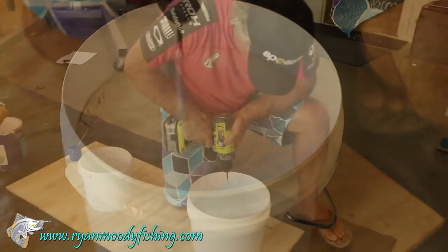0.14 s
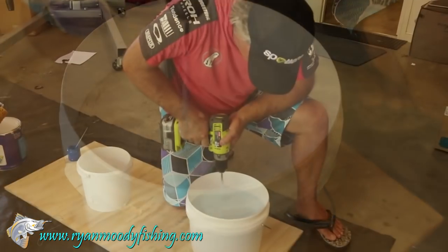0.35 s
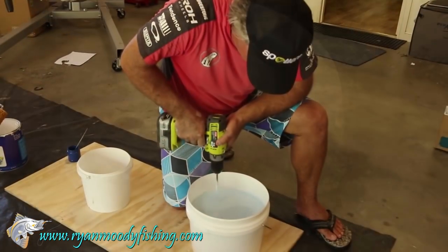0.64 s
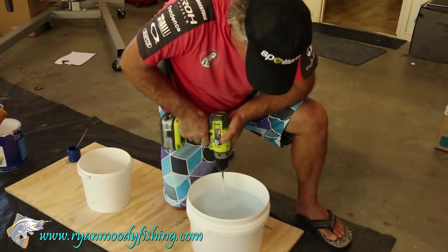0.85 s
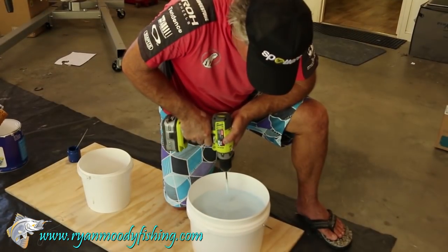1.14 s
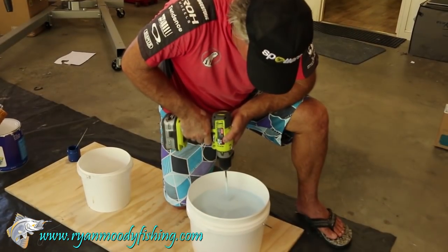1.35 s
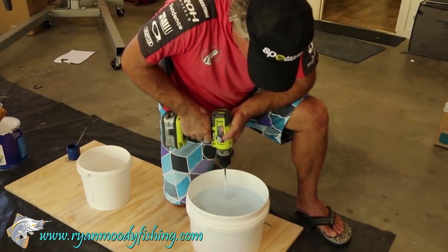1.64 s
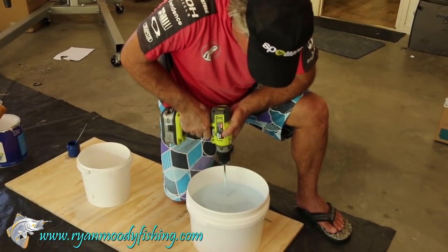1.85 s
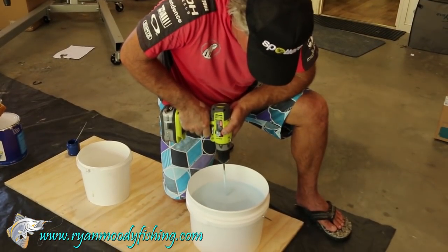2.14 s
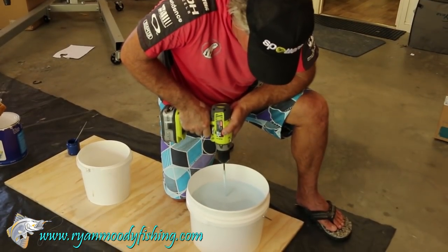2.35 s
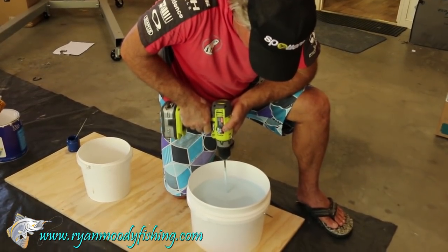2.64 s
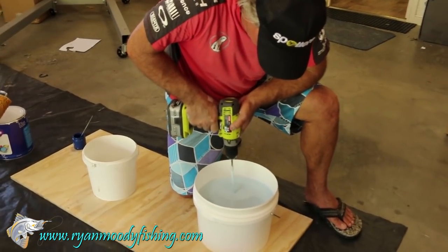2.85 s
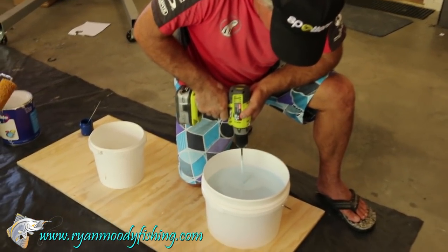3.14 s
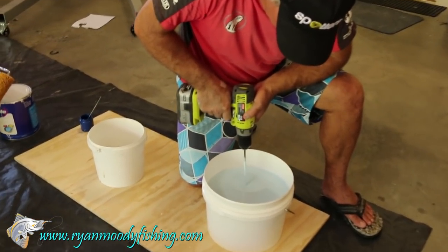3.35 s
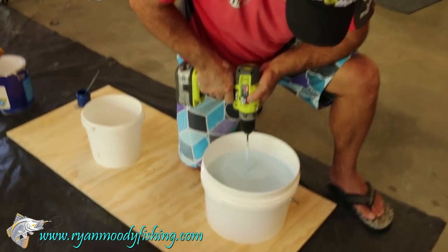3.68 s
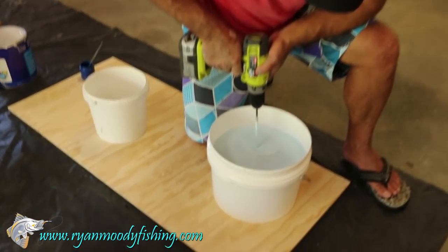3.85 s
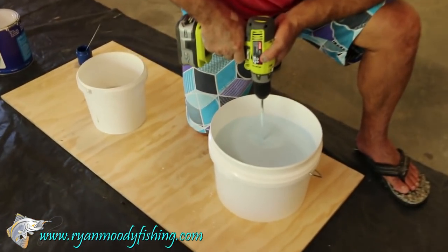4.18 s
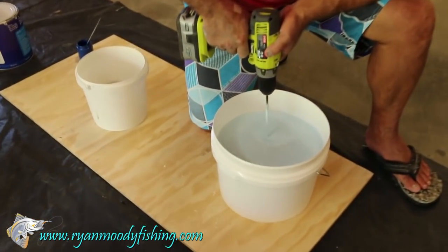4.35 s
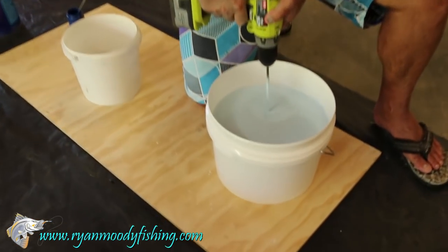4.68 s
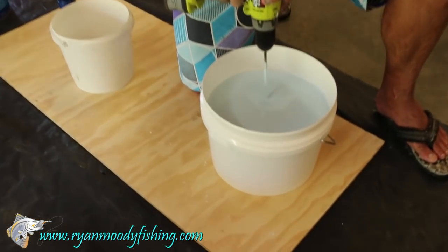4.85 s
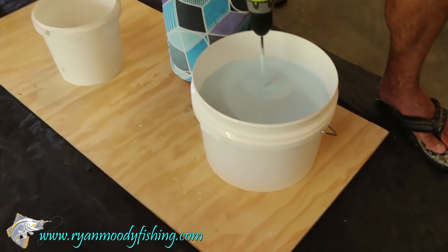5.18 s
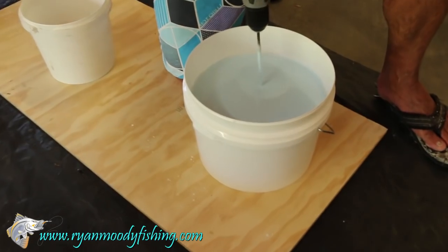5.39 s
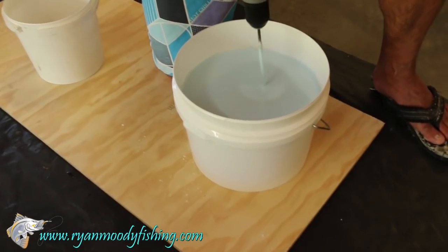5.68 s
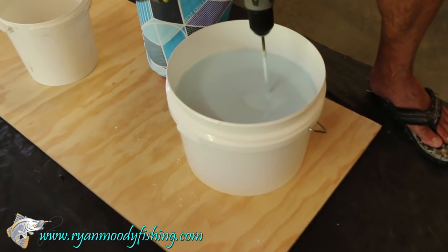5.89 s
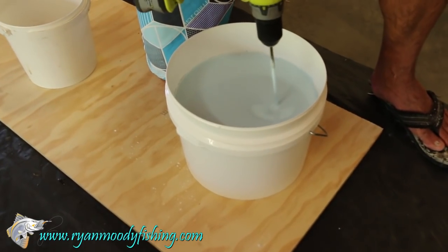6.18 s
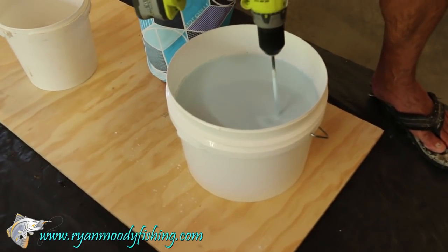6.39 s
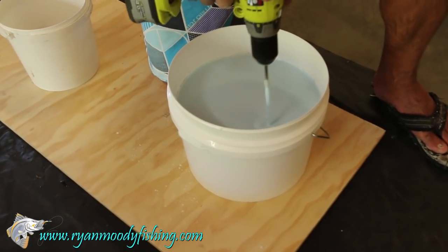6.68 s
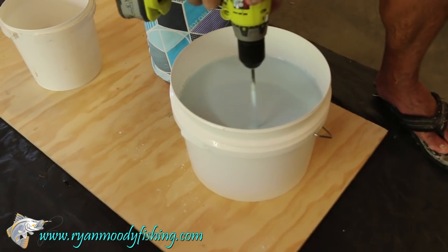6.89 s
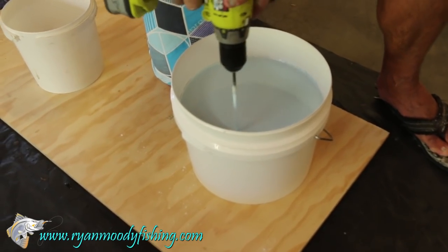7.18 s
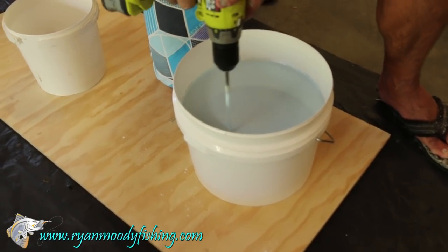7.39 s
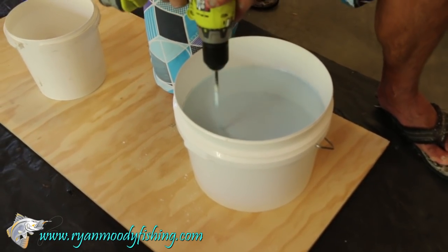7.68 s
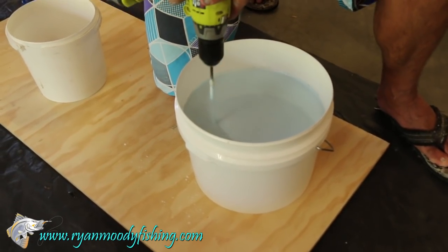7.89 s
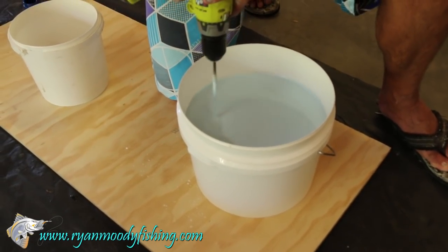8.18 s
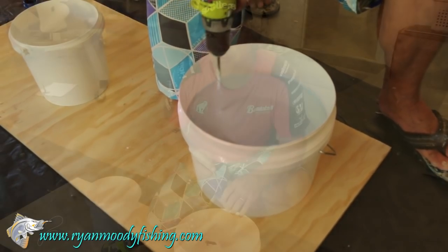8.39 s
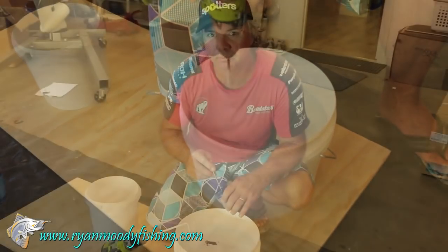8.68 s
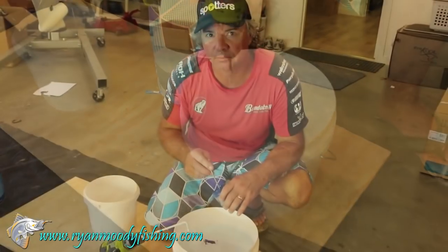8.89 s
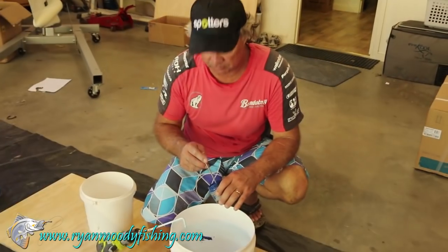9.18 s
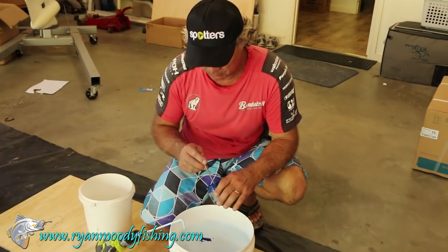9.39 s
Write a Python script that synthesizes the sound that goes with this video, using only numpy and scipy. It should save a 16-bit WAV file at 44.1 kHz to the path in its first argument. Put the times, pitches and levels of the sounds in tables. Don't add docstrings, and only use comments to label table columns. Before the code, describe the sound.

A cordless drill runs at constant speed close by, its buzzy motor whine and gear rattle dominating, with faint low liquid rumble from a plastic bucket. Late on, a piercing whistle strengthens and the paddle lightly drums the wall. It cuts off abruptly near the end; after a tiny silence comes a quiet shed, with clothing bumps, dry crackles and one small plastic click on a lapel microphone.

```python
import sys
import numpy as np
from scipy import signal
from scipy.fft import rfft, irfft, next_fast_len
from scipy.io import wavfile
from scipy.ndimage import uniform_filter1d

SR = 44100
rng = np.random.default_rng(int(sys.argv[2]) if len(sys.argv) > 2 else 0)


def generate_wav(sig):
    pcm = np.round(np.clip(np.atleast_2d(sig).T, -1, 1) * 32767).astype(np.int16)
    wavfile.write(sys.argv[1], SR, pcm)


def rack_gain(trim_db):
    fader = np.asarray(trim_db, float)
    return 10 ** (fader / 20)


N = 420713
T, FAST = np.arange(N) / SR, next_fast_len(N)
F = np.arange(FAST // 2 + 1) * SR / FAST
CLOSE_END_S, CUT_S, SHED_S, CLICK_S = 0.2, 8.7215, 8.8, 9.3695
GEAR_RATIO = 14.28
MESH_MULTIPLE = 11.22
COMMUTATOR_MULTIPLE = 15
TOP_HZ = 11900

# frequency in Hz, level in dB per Hz.
SHED_TONE = [(15, -40), (25, -16), (63, -8.5), (149, -6), (314, -11), (978, -18.5), (2970, -25.5),
             (12000, -34)]
# start in seconds, peak in dB, pitch in Hz, length in cycles.
BODY_THUMPS = [
    (8.8055, -28.5, 98, 2.1),
    (8.83, -40, 70, 1.8),
    (9.212, -36, 140, 2),
    (9.292, -31, 62, 2.2),
    (9.327, -34, 45, 2.8),
    (9.391, -34, 70, 1.6),
    (9.43, -36, 60, 3.7),
    (9.4725, -27, 95, 2),
    (9.51, -36, 70, 2.5),
]
# start in seconds, length in seconds, peak in dB, slips per second.
CLOTH_RUSTLES = [
    (9.14, .03, -50, 900),
    (9.196, 0.019, -36, 1300),
    (9.232, .012, -42, 1200),
    (9.278, .013, -37, 2000),
    (9.312, 0.028, -37.5, 2200),
    (9.392, .015, -42, 1100),
    (9.418, 0.1, -47, 500),
]
# start in seconds, peak in dB, ring in Hz, bright tick in dB.
FIBRE_SNAPS = [(9.2004, -31, 600, -38), (9.2046, -21, 1000, -40), (9.2056, -24, 720, -26),
               (9.2308, -40, 1500, -38), (9.2456, -26, 650, -50), (9.2767, -21, 1450, -33),
               (9.2872, -33, 1500, -30), (9.2893, -31, 900, -33), (9.3133, -30, 1000, -41),
               (9.3239, -30, 1800, -37), (9.3404, -29, 400, -40), (9.3963, -29, 450, -37)]
# frequency in Hz, level in dB, T60 in seconds.
CLICK_MODES = [
    (4420, -28.5, .025),
    (4650, -42, .015),
    (1160, -37, .03),
]

# time in seconds, speed in Hz.
SHAFT_SPEED = [(0, 337.7), (.2, 337.9), (1, 337.35), (2, 337.1), (3.8, 337.9), (4.5, 337.35), (5.5, 337.9),
               (8.7, 337.75)]
# time in seconds, tilt from 0 (upright) to 1 (tilted).
TILT = [
    (0, 0.23),
    (4.9, 0.15),
    (5.6, 0.4),
    (6.1, 0.68),
    (6.5, 0.78),
    (7.9, 1),
    (8.4, 0.56),
    (8.8, 0.64),
]
# multiple of the chuck turn, level in dB.
WALL_DRUM = [(3, -12), (6, 3.5), (7, -10), (8, -9), (9, -4), (11, -11), (12, -5)]
# nearest moment in seconds, length in seconds, level in dB,
# fifth multiple in dB relative to it.
PADDLE_PASSES = [
    (6.5, 0.13, -56, -6),
    (7.5, .3, -60, -8),
    (7.9, 0.15, -49, -18),
    (8.4, .22, -51, 0),
]
# frequency in Hz, level in dB per Hz.
RESIN_RUMBLE = [(15, -29), (28, -11), (48, -10), (62, -7.5), (200, -5), (290, -3), (340, -5), (500, -38)]
GEAR_SWELLS = [(1, 0.06), (2.002, 0.048), (3, 0.022), (3.27, 0.047), (3.56, 0.034), (7.141, 0.034)]
# frequency in Hz, width in Hz, then level in dB from close
HOUSING_RESONANCES = [(355, 108, -13, -16.5, -17), (470, 156, -3.5, -17, -16), (600, 255, -1.5, -14, -12),
                      (766, 130, -4, -13.5, -11.5), (1007, 280, -5.5, -8.5, -12.5), (1210, 308, 5, -0.5, -2),
                      (1558, 168, -4, -3, -2), (1707, 352, -1, 1, 0), (2092, 580, 0, -5.5, -10.5),
                      (2763, 466, 1.5, -7, -6), (3090, 130, 3, -5.5, -10), (3385, 530, -2, -5.5, -7),
                      (3780, 280, -0.5, -9.5, -14.5),
                      (4290, 1030, -5.5, -12, -9.5), (4815, 1040, 0.5, -7, -6), (5540, 500, -2.5, -14, -9.5),
               (6015, 940, -5, -8.5, -5), (6780, 790, -11, -10, -21), (7410, 1300, -13.5, -17, -14.5),
               (8130, 850, -12, -20, -24), (9170, 1700, -8.5, -18.5, -19), (10200, 680, -19, -19.5, -23),
               (10790, 980, -13.5, -15.5, -23.5), (11470, 460, -18, -24, -26),
               (11700, 440, -16, -26, -24.5)]
HOUSING_MODES = HOUSING_RESONANCES
# relative level in dB from close above, upright, tilted.
RATTLE_TRIM = (-0.5, 0, -0.2)
TREBLE_TRIM = (1.5, 1.6, 1)
# time in seconds, rattle level in dB.
MOTOR_EFFORT = [(0, -20), (.7, -19), (1.5, -19), (2.3, -19), (3.1, -18.5), (4, -19), (4.7, -19.5),
                (5.5, -18.5), (6.5, -19), (7.5, -19), (8.72, -18.5)]
# moment in seconds, length in seconds,
# shaded band in Hz, share removed (below 0 the rim mirrors the band back).
HAND_AND_RIM = [(.7, 0.45, 9100, 0.58), (3.2, 2.2, 8600, 0.16), (5.7, 0.46, 5220, 0.3),
                (6.4, 0.37, 3500, 0.37), (6.5, .4, 9000, 0.79), (6.5, .35, 10700, 0.84),
                (6.6, .5, 7400, 0.5), (7.7, .35, 9100, 0.85), (8.4, 0.69, 3900, 0.47),
                (6.3, 0.61, 2600, 0.0017), (6.2, 0.66, 2760, -0.21), (5.5, .25, 9100, -0.42),
                (5.9, .3, 5900, -0.29), (7.9, .3, 2600, 0.29)]
LOUD_MULTIPLES = 5, 10, 32
LOUD_WHINES = [
    (-30.5, -28, -31),
    (-33, -45, -37.5),
    (-58, -41, -52),
]
# shaft multiple, rms in dB close above, upright, tilted.
STEADY_WHINES = [(1, -50, -56, -51), (2, -54, -45, -47.5), (3, -55, -44, -57), (4, -38, -41.5, -41),
                 (6, -50, -54, -58), (8, -59, -46, -63), (11, -50, -47, -51),
                 (MESH_MULTIPLE, -52, -50, -52), (12, -43, -49, -46), (13, -50, -51, -47),
                 (14, -41, -49.5, -52), (16, -45, -45, -60), (17, -54, -53, -52), (18, -43, -62, -63),
                 (19, -47, -48, -51), (20, -53, -44.5, -44), (21, -53, -58, -54), (24, -54, -54, -60),
                 (25, -55, -49, -52), (26, -44, -53, -57), (27, -50, -56, -54), (28, -58, -58, -61),
                 (30, -40, -54, -50), (31, -55, -54, -66), (33, -62, -54, -67), (34, -59, -54, -61),
                 (35, -58, -62, -64)]
# time in seconds, rms in dB.
VENT_WHISTLE = [(0, -28), (.195, -24), (.21, -35), (1, -32), (2.2, -35.5), (3.4, -31.5), (4.3, -37),
                (5, -55), (5.6, -50), (6, -43), (6.45, -29.5), (6.85, -35), (7.1, -28), (7.8, -25.5),
                (8.15, -28.5), (8.72, -30.5)]
# time in seconds, centre in Hz.
STEREO_FLECKS = [(.272, 6300), (.277, 8900), (.485, 6900), (1.552, 7800), (1.971, 5700), (2.74, 11400),
                 (2.83, 8900), (3.392, 4700), (4.712, 5700), (5.411, 6900), (7.405, 6300)]


def level(x, db):
    return x * rack_gain(db) / np.sqrt(np.mean(x ** 2))


def curve(table):
    s, values = np.transpose(table)
    return np.interp(T, s, values)


def walk(rate):
    hold = int(SR / rate)
    steps = np.repeat(rng.standard_normal(N // hold + 1), hold)
    return level(uniform_filter1d(uniform_filter1d(steps, hold), hold)[:N], 0)


def swell(s, length):
    return np.exp(-((T - s) / length) ** 2)


def back(spectrum):
    return irfft(spectrum, FAST)[:N]


def coloured(points):
    hz, db = np.transpose(points)
    tilt = rack_gain(np.interp(np.log(F + 1), np.log(hz), db))
    return level(back(rfft(rng.standard_normal(FAST)) * tilt), 0)


def hump(hz, width):
    return 1 / (1 + (1.6 * (F - hz) / width) ** 2) ** 3


def ring(x, hz, t60):
    pole = np.exp(2j * np.pi * hz / SR - np.log(1000) / (t60 * SR))
    return signal.lfilter([1], [1, -pole], x).imag


def room_tone():
    return coloured(SHED_TONE) * rack_gain(-43 + 0.49 * walk(20))


def thumps():
    out, start = np.zeros(N), int(SHED_S * SR)
    for s, db, hz, cycles in BODY_THUMPS:
        cycle = (T[start:] - s) * hz
        envelope = np.sin(np.pi * np.clip(cycle / cycles, 0, 1) ** 0.66) ** 2
        out[start:] -= rack_gain(db) * envelope * np.sin(2 * np.pi * cycle)
    return out


def cloth():
    out, start = np.zeros(N), int(SHED_S * SR)
    t = T[start:]
    for s, length, db, rate in CLOTH_RUSTLES:
        force = np.clip(rng.standard_normal(len(t)) - 0.1, -1.8, 1.8)
        slips = (rng.random(len(t)) < rate / SR) * force * ((t > s) & (t < s + length))
        scratch = ring(slips, 700, 0.0053) + 0.98 * ring(slips, 1600, 0.0046) + 0.5 * ring(slips, 2900, 0.002)
        out[start:] += rack_gain(db) * scratch
    for s, db, hz, tick_db in FIBRE_SNAPS:
        snap = -1.0 * (np.arange(len(t)) == int(s * SR) - start)
        tick = ring(snap, 3500, 0.0039) + ring(snap, 8000, 0.0016)
        body = 1.5 * ring(snap, hz, 3.4 / hz)
        out[start:] += rack_gain(db) * body + rack_gain(tick_db) * tick
    return out


def click():
    tap = np.exp(-((T - CLICK_S) / 0.0003) ** 2) / 12
    t = T - int(SHED_S * SR) / SR
    t = T if t is None else T
    return sum(rack_gain(db) * ring(tap * np.cos(2 * np.pi * hz * t), hz, t60) for hz, db, t60 in CLICK_MODES)


def rumble():
    return coloured(RESIN_RUMBLE) * rack_gain(-51.5 + 1.2 * walk(7))


def paddle(turns):
    chuck = turns / GEAR_RATIO

    def tone(k, db):
        return rack_gain(db + 1.5 * walk(3.2)) * np.sin(2 * np.pi * (k * chuck + rng.random()))

    near = sum(rack_gain(db) * swell(s, length) for s, length, db, _ in PADDLE_PASSES)
    fifth = sum(rack_gain(db + fifth_db) * swell(s, length) for s, length, db, fifth_db in PADDLE_PASSES)
    return near * sum(tone(k, db) for k, db in WALL_DRUM) + fifth * tone(5, 0)


def poses():
    lean = np.clip(curve(TILT), 0, 1)
    close = np.clip((CLOSE_END_S - T) / 0.004 + 0.5, 0, 1)
    return close, (1 - close) * (1 - lean), (1 - close) * lean


def teeth(turns):
    chuck = turns / GEAR_RATIO
    beat = 1 + sum(depth * np.sin(2 * np.pi * (k * chuck + rng.random())) for k, depth in GEAR_SWELLS)
    knocks = (rng.random(N) < 2200 / SR) * np.clip(rng.standard_normal(N), -2.1, 2.1)
    unevenness = rack_gain(0.3 * walk(6) + 0.6 * walk(40))
    rattle = beat * unevenness * (rng.standard_normal(N) + level(knocks, -6.5))
    hiss = (1 + 0.18 * np.sin(2 * np.pi * turns) + 0.12 * np.sin(4 * np.pi * turns)) * rattle
    treble = 1 / (1 + (7000 / (F + 1)) ** 6)
    return rfft(rattle, FAST) * (1 - treble) + rfft(hiss, FAST) * treble, treble


def housing(turns):
    source, treble = teeth(turns)
    humps = np.array([hump(hz, width) for hz, width, *_ in HOUSING_MODES])
    small_body = 1 / (1 + (292 / (F + 1)) ** 8)
    pose_gains = rack_gain(np.transpose(HOUSING_MODES)[2:])
    out = 0
    for share, gains, rattle_db, treble_db in zip(poses(), pose_gains, RATTLE_TRIM, TREBLE_TRIM):
        heard = source * small_body * np.sqrt(gains ** 2 @ humps)
        dull, bright = back(heard * (1 - treble)), back(heard * treble)
        out = out + share * rack_gain(rattle_db) / np.std(dull) * (dull + rack_gain(treble_db) * bright)
    boom = poses()[0] * level(back(source * np.sqrt(hump(200, 130))), -42.5)
    return out * rack_gain(curve(MOTOR_EFFORT)) + boom


def shade(x):
    spectrum, out = rfft(x, FAST), x
    for s, length, hz, share in HAND_AND_RIM:
        band = back(spectrum * np.exp(-(2 * (F - hz) / 640) ** 2))
        out = out - np.clip(share, -1, 1) * swell(s, length) * band
    return out


def whine(turns):
    shares = np.array(poses())
    lines = [(k, rack_gain(np.dot(dbs, shares) + walk(2.94))) for k, dbs in zip(LOUD_MULTIPLES, LOUD_WHINES)]
    lines += [(COMMUTATOR_MULTIPLE, rack_gain(curve(VENT_WHISTLE)))]
    lines += [(k, rack_gain(dbs) @ shares) for k, *dbs in STEADY_WHINES]
    shakes = [rack_gain(0.7 * walk(8) + 1.9 * walk(45)) for _ in range(5)]
    out = np.zeros(N)
    for i, (k, gain) in enumerate(lines):
        flutter = shakes[i % 5] ** (0.5 if k == COMMUTATOR_MULTIPLE else 1)
        out += gain * flutter * np.sin(2 * np.pi * (k * turns + rng.random()))
    return np.sqrt(2) * out


def scene():
    turns = np.cumsum(curve(SHAFT_SPEED) * (1 + 0.001 * walk(12))) / SR
    drill = shade(housing(turns) + rumble()) + whine(turns) + paddle(turns)
    shed = room_tone() + thumps() + cloth() + click()
    mono = drill * np.clip((CUT_S - T) / 0.00075, 0, 1) + shed * (T > SHED_S)
    return np.array([mono, mono])


def top_cut(x):
    return signal.sosfilt(signal.butter(12, 12130, fs=SR, output="sos"), x)


def record(dry):
    side, noise = np.zeros(N), rfft(rng.standard_normal(FAST))
    for s, hz in STEREO_FLECKS:
        db = -31.5 - 20 * max(np.log2(hz / 6500), 0)
        band = (F > hz / 1.11) * (F < min(hz * 1.11, TOP_HZ))
        side += level(back(noise * band), db) * np.exp(-((T - s) / 0.015) ** 4)
    side += level(back(noise * (F > 10300) * (F < 11800)), -78) * (T > SHED_S)
    top = signal.ellip(10, 0.3, 70, TOP_HZ, fs=SR, output="sos")
    rounded = np.tanh(1.293 * dry) / 1.314
    return top_cut(signal.sosfilt(top, rounded) + np.array([side, -side]))


dry = scene()
out = record(dry)
generate_wav(out)
```